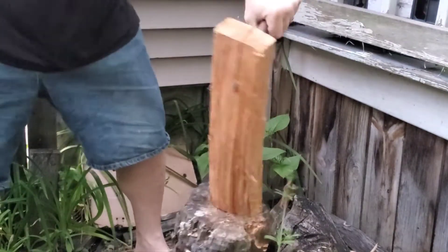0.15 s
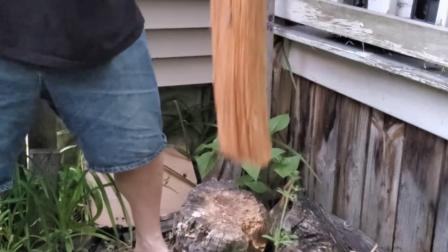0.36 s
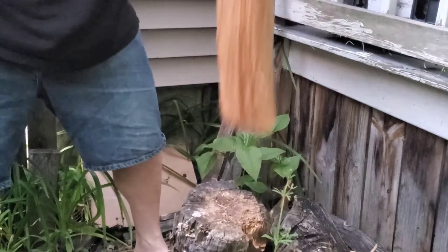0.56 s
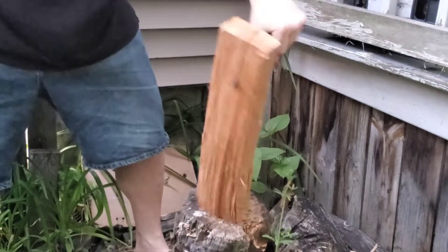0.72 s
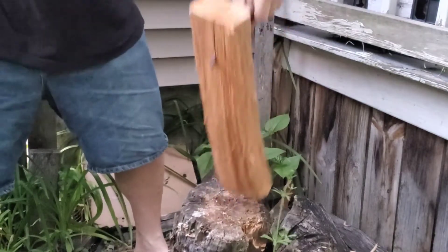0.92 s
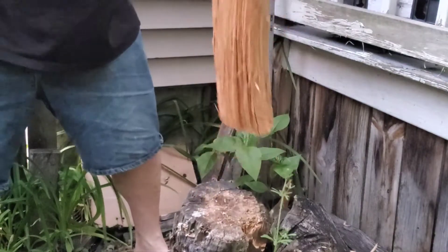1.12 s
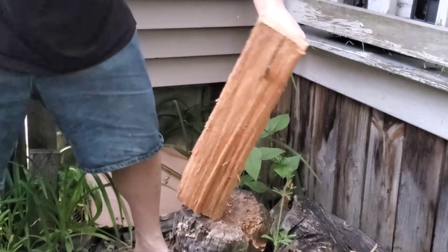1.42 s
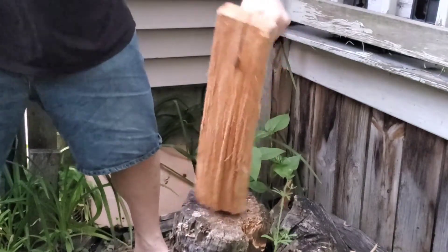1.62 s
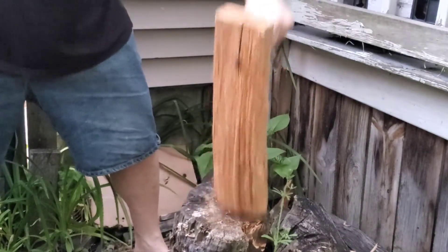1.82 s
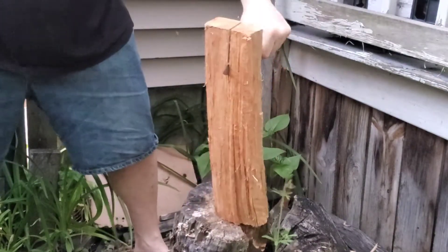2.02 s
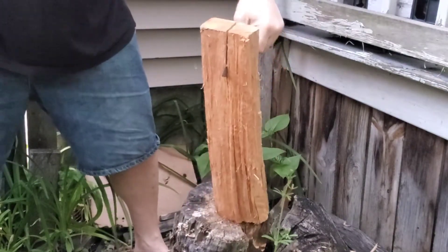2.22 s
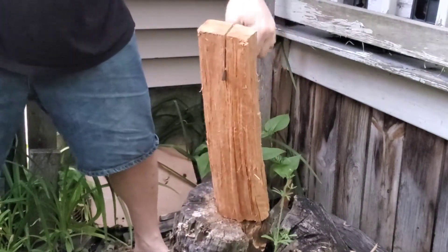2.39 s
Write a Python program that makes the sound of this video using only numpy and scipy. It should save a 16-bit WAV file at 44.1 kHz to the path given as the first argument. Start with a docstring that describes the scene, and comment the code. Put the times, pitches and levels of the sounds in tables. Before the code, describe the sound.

Three sharp wooden knocks on a blade splitting a log outdoors, over a faint low hum.

```python
"""A wooden baton knocks three times on a knife blade wedged in a log that stands on a stump.
Each blow rings the baton, thuds through the log and tears fibres; the split ticks and its splinters
rub, then the log is set down with a crunch. The yard's fence and the houses throw the sound back.
Behind it a low hum wavers and a distant engine picks up speed, then eases off."""
import sys
import numpy as np
from scipy import signal
from scipy.fft import rfft, irfft
from scipy.io import wavfile
from scipy.ndimage import map_coordinates

SR = 44100
rng = np.random.default_rng(int(sys.argv[2]) if len(sys.argv) > 2 else 0)


def inscribe(sig):
    """Save sig as 16-bit PCM at rate SR to the path in sys.argv[1].

    A 1-D sig is mono; a 2-D sig holds one channel per row.
    Samples are clipped to [-1, 1] before scaling.
    """
    pcm = np.round(np.clip(np.atleast_2d(sig).T, -1, 1) * 32767)
    wavfile.write(sys.argv[1], SR, pcm.astype(np.int16))


N = 112454

# The hits (time [s], attack [s], baton pitch [Hz], baton level [dB], after-ring [dB], baton top [Hz],
# log level [dB], log low edge [Hz], log high edge [Hz], tear level [dB], tear treble boost [dB],
# crack level [dB], crack pitch [Hz], echo send [dB])
BLOWS = [(0.2401, 0.00062, 1304, -2.5, -18, 4450, -15.5, 430, 2050, -27.5, 2, -23, 2370, -10.5),
         (0.8735, 0.0018, 1306, -3, -27, 1770, -11, 260, 1160, -21.5, -3.5, -26, 2780, -15),
         (1.4938, 0.0013, 1315, -4.5, -20, 4260, -6.5, 100, 612, -19, 3.5, -14.5, 2656, -18.5)]
def blows():
    """Each hit stacks baton clack, log thud, tearing fibres and a splitting crack; the houses answer."""
    direct, echo_send = 0, 0
    for (start, attack_s, baton_hz, baton_db, ring_db, top_hz, log_db, low_hz, high_hz,
         tear_db, treble_db, crack_db, crack_hz, echo_db) in BLOWS:
        clack = undb(baton_db) * baton(baton_hz, ring_db, top_hz)
        thud = undb(log_db) * log_thud(low_hz, high_hz)
        tear = undb(tear_db) * tearing_fibres(treble_db)
        crack_band = [(crack_hz / 2, -65), (crack_hz, 0), (crack_hz * 2, -80)]
        crack = undb(crack_db) * colour(crackle() * fade(t60=0.018), crack_band)
        attack = 1 - np.exp(-clock() / attack_s)
        knock = delay(attack * ((clack + thud) * pan(db=-0.3) + tear + crack), start)
        direct += knock
        echo_send += undb(echo_db) * knock
    houses = reflect(echo_send, db=-16.5, t60=0.81, delay_s=0.045)
    slap = reflect(echo_send, db=-17.5, t60=0.23, delay_s=0.068)  # one house front stands out
    return direct + houses + slap


# Overtones of baton and blade (frequency [Hz], level [dB], t60 [s])
BATON_MODES = [(1237, -19.5, 0.02), (1344, -20, .05), (1494, -29, 0.015), (1630, -27, 0.033),
               (1974, -34.5, 0.14), (2250, -29.5, 0.035), (2650, -38, .07), (3560, -47, .08),
               (4350, -42.5, 0.065)]
EAR_LEAD_S = np.array([[.00006], [0]])  # ringing wood reaches the left ear first
def baton(hz, ring_db, top_hz):
    """A clack drops to a weaker ring, wavering as the baton chatters; a softer contact dulls its top."""
    envelope = fade(t60=0.045) + undb(ring_db) * fade(t60=0.09)
    chatter_rad = walk(per_s=130)
    tone = envelope * np.sin(2 * np.pi * hz * (clock() + EAR_LEAD_S) + chatter_rad)
    return butter(tone + ring(BATON_MODES), "low", top_hz, order=8)


# Body of the log on its stump (frequency [Hz], level [dB], t60 [s])
LOG_MODES = [(95, -9, 0.088), (150, -16, 0.048), (195, -15.5, 0.082), (300, -15.5, 0.078),
             (385, -5.5, .068), (442, -7.5, 0.069), (483.7, -2, 0.048), (553, -10, 0.046),
             (608, -2.5, 0.048), (693, -12, 0.069), (836, -2, 0.033), (939, 4.5, 0.019), (990, -14.5, .035)]
def log_thud(low_hz, high_hz):
    """The log resonates; the deeper the blade sits, the lower the modes that it drives."""
    body = butter(ring(LOG_MODES), "high", low_hz, order=2)
    return butter(body, "low", high_hz, order=6)


# Tone colour of the tearing wood (frequency [Hz], level [dB])
TEAR_SPECTRUM = [(300, 7), (1000, 6), (1650, -2), (2000, -1.5), (2650, -4.5), (3200, -4.5), (3600, -6.5),
                 (5000, -7), (7200, -15), (10000, -14), (13000, -17.5), (16000, -22.5)]
def tearing_fibres(treble_db, treble_above_hz=6000):
    """Many fibres rip at once in a burst of crackle with a softer tail."""
    burst = crackle() * (fade(t60=.07) + undb(-10) * fade(t60=0.19))
    return colour(burst, [(hz, db + treble_db * (hz > treble_above_hz)) for hz, db in TEAR_SPECTRUM])


# Ticks in the split (time [s], level [dB], pan left minus right [dB])
SNAPS = [(0.2690, -35.5, 0.5), (0.771, -50, -1), (0.8835, -47, 9.5), (0.9017, -35, 0), (0.913, -42, 15),
         (0.944, -40.5, -3), (0.948, -39.5, 4), (1.043, -36, 1), (1.0658, -38, 1.5), (1.0906, -41, 0.5),
         (1.117, -51, 5), (1.1425, -54, -3), (1.5008, -23.5, -5), (1.517, -44, 9), (1.5178, -18.5, 3.5),
         (2.0662, -20, 2), (2.0815, -33, -2), (2.0992, -28, 4.5), (2.34, -49.5, 6)]
# Their crisp tone colour (frequency [Hz], level [dB])
SNAP_SPECTRUM = [(800, -12), (2500, -10.5), (5000, -16), (7200, -20.5), (9500, -4), (13000, -0.5),
                 (14500, 0), (16000, -17.5)]
def fibre_snaps(top_at_0_db_hz=18200, hz_per_db=164.5):
    """Single fibres give way with a tick; the stronger, the brighter."""
    envelope = fade(t60=0.0055) + undb(-17) * fade(t60=0.044)
    mid, side = rng.standard_normal((2, N))
    noise = unit(stereo(mid, side, width=0.5))
    ticks = 0
    for start, db, pan_db in SNAPS:
        tick = butter(noise * delay(envelope, start), "low", top_at_0_db_hz + hz_per_db * db, order=2)
        ticks += undb(db) * pan(pan_db) * tick
    return colour(ticks, SNAP_SPECTRUM)


# Soft swells of rubbing (peak time [s], level [dB], half length [s], squeak against rasp [dB])
RUBS = [(0.276, -44.5, 0.021, -9), (0.318, -58.5, 0.087, -29), (0.403, -64.5, 0.01, 7),
        (0.534, -64, 0.059, -26), (0.591, -58, 0.0054, -13), (0.924, -53.5, 0.03, -8),
        (0.994, -57, 0.026, -12), (1.046, -52.5, 0.0044, -10), (1.082, -59.5, 0.032, -19),
        (2.151, -55.5, 0.008, -10)]
# Tone colour of the rasp (frequency [Hz], level [dB])
RASP_SPECTRUM = [(500, 0), (1500, 6.5), (4000, -2), (7200, -7.5), (10000, -5.5), (13000, -10.5),
                 (16000, -9)]
def splinter_rubs():
    """Splinters rasp as the log shifts on the blade, some with a thin squeak on top."""
    rasp = unit(colour(crackle(), RASP_SPECTRUM))
    squeak = unit(colour(crackle(), [(7000, -28), (11900, 0), (16800, -35)]))
    out = 0
    for peak_s, db, half_s, squeak_db in RUBS:
        swell = np.exp(-((clock() - peak_s) / half_s) ** 2)
        out += undb(db) * swell * (rasp + undb(squeak_db) * squeak)
    return out


# Touches of the log's foot on the stump (time [s], level [dB])
SCUFFS = [(2.0481, -33), (2.0515, -21.5), (2.0565, -43), (2.1022, -29), (2.158, -48)]
# Tone colour of the crunch (frequency [Hz], level [dB])
CRUNCH_SPECTRUM = [(200, -1), (420, 2), (700, -8), (1050, -1.5), (1600, -6), (2000, 1), (3000, -4),
                   (4200, -6.5), (7200, -14.5), (10500, -15), (16000, -30)]
# Ring of the stump's top (frequency [Hz], level [dB], t60 [s])
STUMP_MODES = [(406, -11.5, .06), (1027, -10, 0.065), (1358, -16, 0.053), (1900, -16, 0.041),
               (2454, -21, .06), (3300, -38, 0.052), (4080, -19, 0.084)]
def log_set_down():
    """The log lands on the rough stump with a woody knock and a short, grainy crunch."""
    envelope = fade(t60=0.0032) + undb(-12.5) * fade(t60=0.13)
    touches = sum(delay(undb(db) * envelope, start) for start, db in SCUFFS)
    crunch = colour(crackle() * touches, CRUNCH_SPECTRUM)
    knocks = sum(delay(undb(db) * ring(STUMP_MODES), start) for start, db in SCUFFS)
    return crunch + knocks


# The engine's rev curve (time [s], firing rate [Hz], level [dB])
ENGINE_REVS = [(0, 51.6, -60.5), (1.2, 46.97, -53), (1.45, 52.52, -52), (1.62, 56.78, -35.5),
               (1.76, 62.48, -35), (1.92, 65.95, -29.5), (2.12, 70.6, -33), (2.3, 68.15, -32.5),
               (2.55, 58.7, -41)]
# Its partials (multiple of the firing rate, level [dB])
ENGINE_ORDERS = [(1, -2.5), (1.5, -17), (2, -15.5), (2.5, -13), (3.5, -15), (4.5, -22)]
def distant_engine():
    """A drone follows the firing rate as it climbs and eases, each partial fluttering in level."""
    firings = np.cumsum(curve(ENGINE_REVS) * (1 + .012 * walk(per_s=14))) / SR
    drone = 0
    for multiple, db in ENGINE_ORDERS:
        drone += undb(db + 3 * walk(per_s=9)) * np.sin(2 * np.pi * (multiple * firings + rng.random()))
    return np.sqrt(2) * undb(curve(ENGINE_REVS, column=2)) * drone


# Fader ride of the hum (time [s], level [dB])
HUM_LEVEL = [(0, -39), (.18, -35.5), (.35, -44), (.7, -48.5), (1.0, -42), (1.5, -42), (1.95, -41),
             (2.55, -42)]
def low_hum(hz=88.74, waver=0.033):
    """One low tone, unsteady in pitch and level."""
    gain = np.sqrt(2) * undb(curve(HUM_LEVEL) + walk(per_s=31))
    cycles = np.cumsum(hz * (1 + waver * walk(per_s=8))) / SR
    return gain * np.sin(2 * np.pi * cycles)


# Tone colour of the traffic rumble (frequency [Hz], level [dB])
RUMBLE_SPECTRUM = [(30, -22), (60, -9), (110, 9), (150, -3.5), (230, 1.5), (320, -5.5), (480, -20),
                   (850, -25), (1500, -28.5), (3500, -40), (7000, -53), (10000, -51.5), (16000, -61)]
# Fader ride of the rumble (time [s], level [dB])
RUMBLE_LEVEL = [(0, -40), (.2, -41.5), (.5, -51), (1.0, -52), (1.35, -42.5), (1.75, -38.5), (2.0, -39.5),
                (2.3, -37), (2.55, -36)]
# Fader ride of the tyres (time [s], level [dB])
TYRE_LEVEL = [(1.3, -72), (1.7, -53), (1.95, -48), (2.15, -47), (2.55, -71)]
def traffic(tyre_hz=733):
    """Far traffic rumbles, and a midrange rush of tyres swells with the engine."""
    rumble = undb(curve(RUMBLE_LEVEL) + 0.31 * walk(per_s=3.3)) * outdoor_noise(RUMBLE_SPECTRUM)
    tyre_band = [(tyre_hz / 2, -22), (tyre_hz, 0), (tyre_hz * 2, -18), (9000, -50)]
    return rumble + undb(curve(TYRE_LEVEL)) * outdoor_noise(tyre_band)


# Tone colour of the outdoor bed (frequency [Hz], level [dB])
AIR_SPECTRUM = [(25, -29), (50, 1.5), (95, 5.5), (135, -17), (220, -13.5), (330, -19.5), (460, -25.5),
                (750, -29.5), (1400, -33), (2200, -42.5), (3300, -43.5), (7000, -56.5), (10000, -52),
                (16000, -65.5)]
def still_air():
    """A steady, dark bed of noise under everything."""
    return undb(-42) * outdoor_noise(AIR_SPECTRUM)


def ring(modes):
    """Struck modes die away, their phases scattered a little on every hit."""
    t, out = clock() + EAR_LEAD_S, 0
    for k, (hz, db, t60) in enumerate(modes):
        phase = rng.uniform(-1, 1) - k * np.pi / 4
        out += undb(db) * fade(t60) * np.sin(2 * np.pi * hz * t + phase)
    return out


def crackle(clicks_per_s=5000, spread_db=2):
    """Dense clicks of uneven size, partly different at the two ears."""
    clicks = (rng.random((2, N)) < clicks_per_s / SR) * rng.choice([-1, 1], (2, N))
    sizes = undb(spread_db * np.minimum(rng.exponential(size=(2, N)), 3))
    mid, side = unit(clicks * sizes)
    return unit(stereo(mid, side, width=0.75))


def reflect(x, db, t60, delay_s):
    """Diffuse reflections that start after a delay."""
    response = delay(diffuse() * fade(t60), delay_s)
    return undb(db) * signal.fftconvolve(x, unit(response) / np.sqrt(N), axes=-1)[:, :N]


def outdoor_noise(spectrum):
    """Diffuse noise with a given spectrum."""
    return unit(colour(diffuse(), spectrum))


def diffuse(wide_above_hz=710):
    """Noise that is centred in the bass and wide above."""
    mid, side = rng.standard_normal((2, N))
    return stereo(mid, butter(side, "high", wide_above_hz, order=1), width=1)


def colour(x, points, size=4096):
    """Minimum-phase EQ of unit power through (frequency [Hz], level [dB]) points."""
    hz, db = np.array(points).T
    bins_hz = np.arange(size // 2 + 1) * SR / size
    gain = unit(undb(np.interp(np.log(bins_hz + 1), np.log(hz), db)))
    cepstrum = irfft(np.log(gain))
    cepstrum[1:size // 2] *= 2
    cepstrum[size // 2 + 1:] = 0  # nothing rings ahead of a hit
    response = irfft(np.exp(rfft(cepstrum)))
    return signal.fftconvolve(x, response[None], axes=-1)[:, :N]


def butter(x, kind, hz, order):
    """Low-pass or high-pass filter."""
    return signal.sosfilt(signal.butter(order, hz, kind, fs=SR, output="sos"), x)


def walk(per_s):
    """Smooth random drift with a spread near 1."""
    return map_coordinates(rng.standard_normal(512), [clock() * per_s], mode="mirror")


def curve(rows, column=1):
    """One column of a table joined by straight lines in time."""
    rows = np.array(rows)
    return np.interp(clock(), rows[:, 0], rows[:, column])


def fade(t60):
    """Decay by 60 dB in t60 seconds."""
    return np.exp(-np.log(1000) * np.minimum(clock() / t60, 10))


def delay(x, s):
    """Start a sound s seconds later."""
    k = int(np.clip(s * SR, 0, N - 1))
    return np.concatenate([np.zeros(x.shape[:-1] + (k,)), x[..., :N - k]], axis=-1)


def stereo(mid, side, width):
    """Mid and side to left and right."""
    return mid + width * side * np.array([[1], [-1]])


def pan(db):
    """Left and right gains, db apart."""
    return undb(np.array([[db], [-db]]) / 2)


def undb(db):
    """Decibels to gain."""
    return 10 ** (np.asarray(db) / 20)


def unit(x):
    """Scale to rms 1."""
    return x / np.sqrt(np.mean(x ** 2))


def clock():
    """Time of each sample in seconds."""
    return np.arange(N) / SR


def scene():
    """The woodwork up front, with tight reflections from fence and house wall, over the background."""
    wood = blows() + fibre_snaps() + splinter_rubs() + log_set_down()
    yard = reflect(wood, db=-13.5, t60=0.11, delay_s=.003)
    return wood + yard + distant_engine() + low_hum() + traffic() + still_air()


def record(dry, low_cut_hz=38, top_hz=15600):
    """The recorder thins the deepest bass, clips at full scale and cuts the top."""
    clipped = np.clip(butter(dry, "high", low_cut_hz, order=4), -1, 1)
    return signal.sosfilt(signal.ellip(8, .2, 70, top_hz, fs=SR, output="sos"), clipped)


dry = scene()
out = record(dry)
inscribe(out)
```